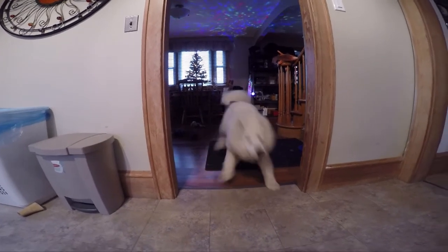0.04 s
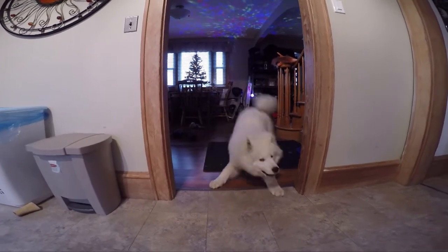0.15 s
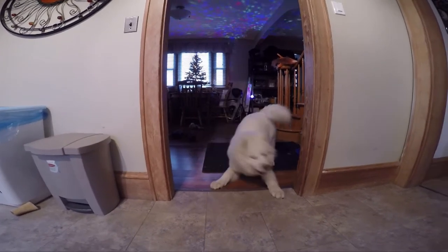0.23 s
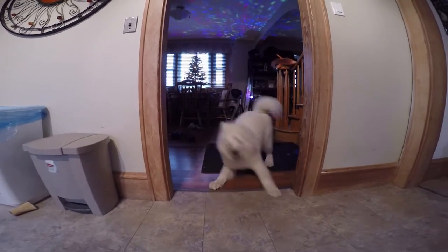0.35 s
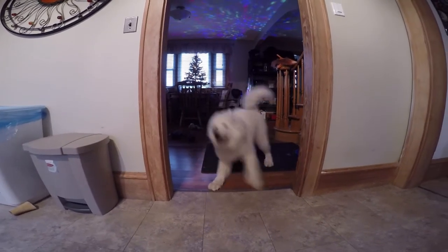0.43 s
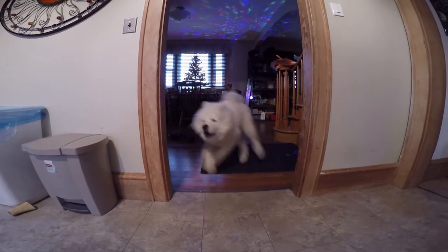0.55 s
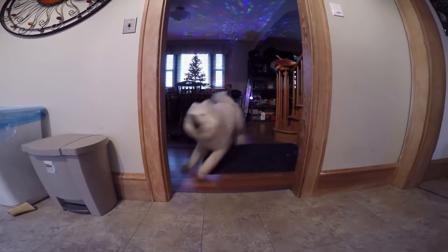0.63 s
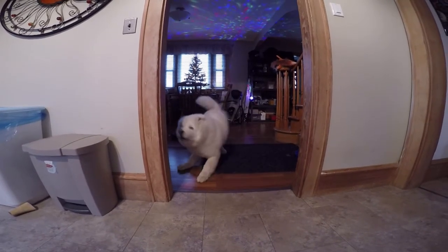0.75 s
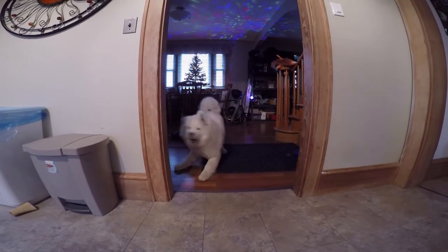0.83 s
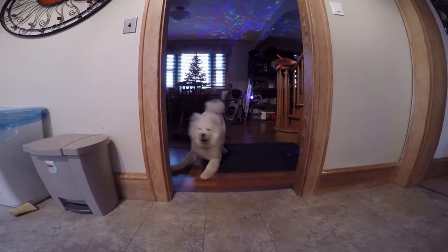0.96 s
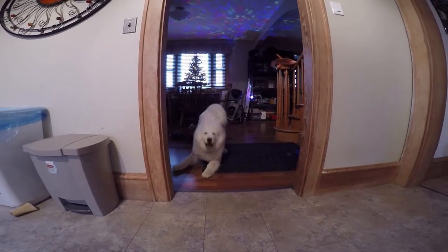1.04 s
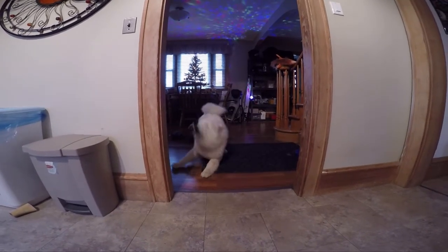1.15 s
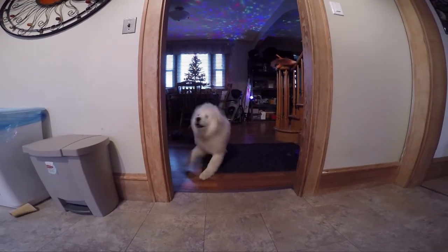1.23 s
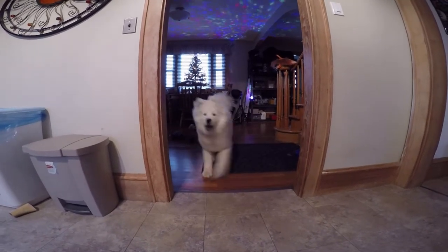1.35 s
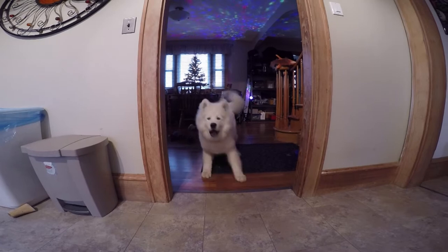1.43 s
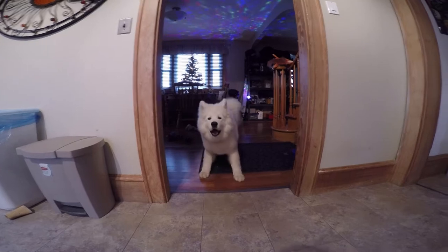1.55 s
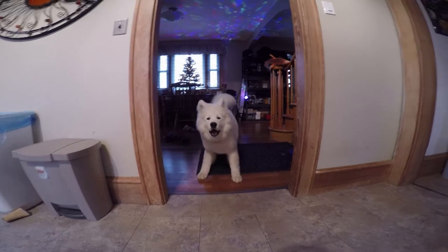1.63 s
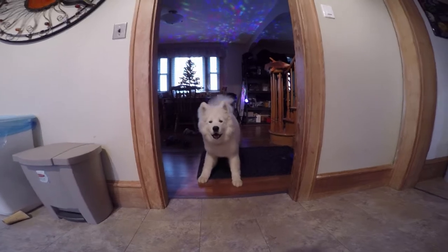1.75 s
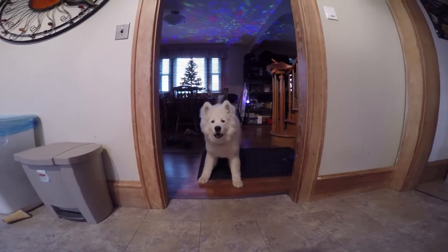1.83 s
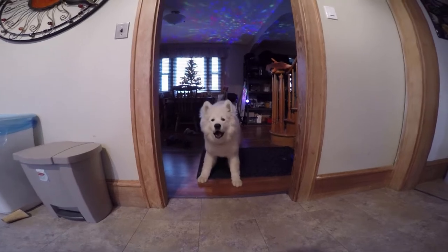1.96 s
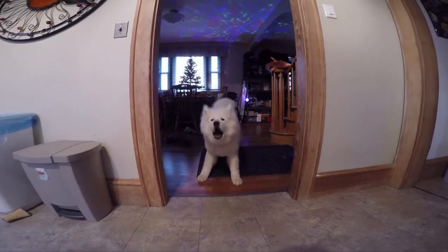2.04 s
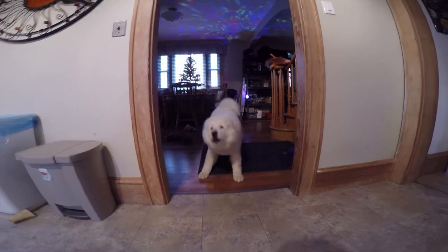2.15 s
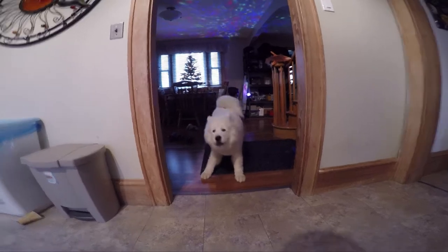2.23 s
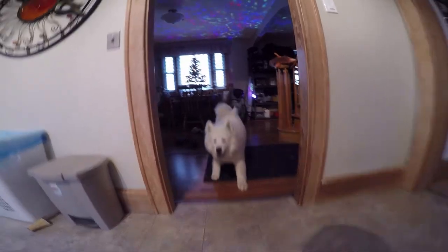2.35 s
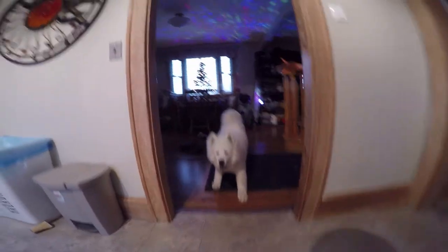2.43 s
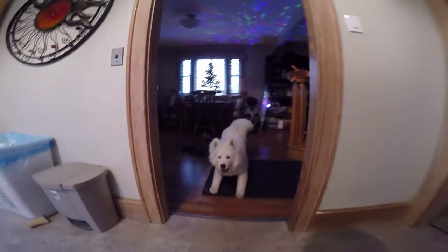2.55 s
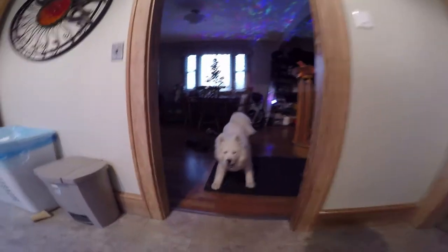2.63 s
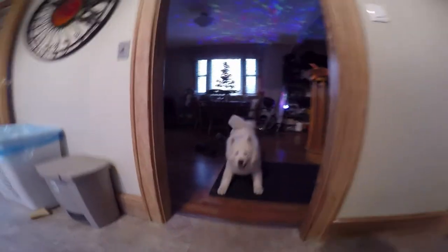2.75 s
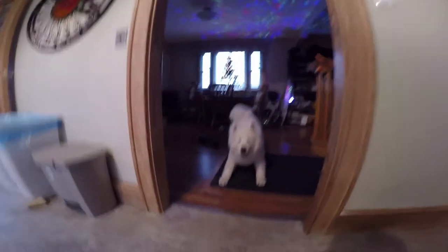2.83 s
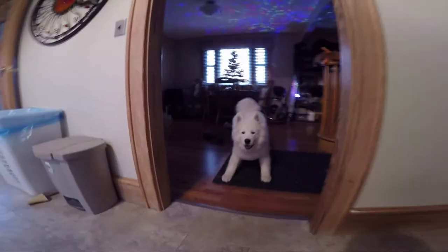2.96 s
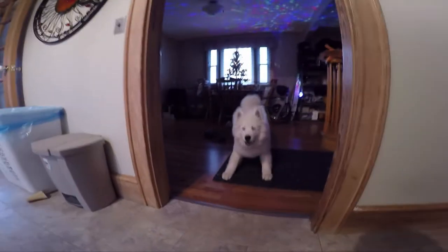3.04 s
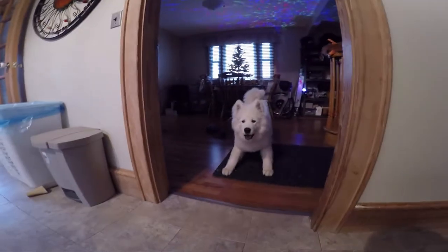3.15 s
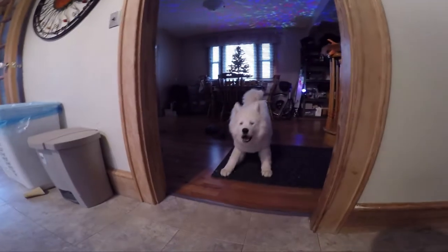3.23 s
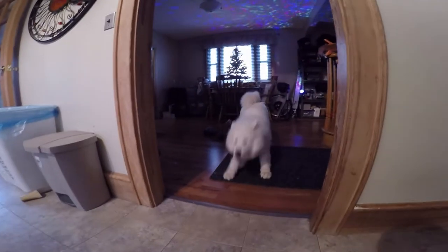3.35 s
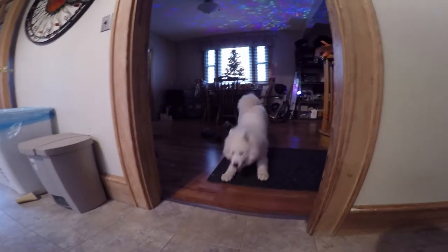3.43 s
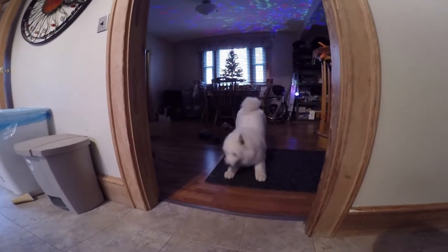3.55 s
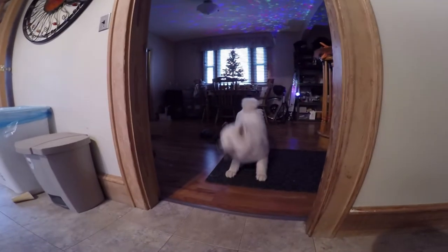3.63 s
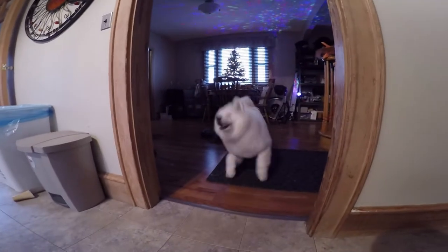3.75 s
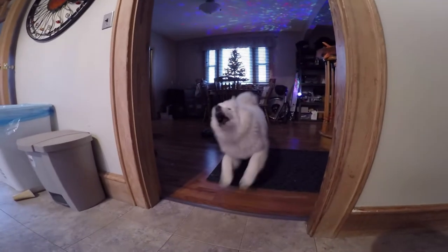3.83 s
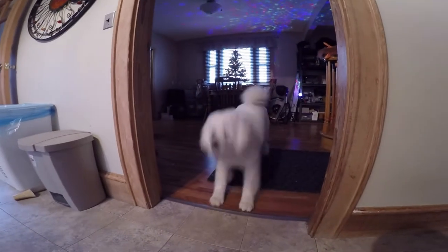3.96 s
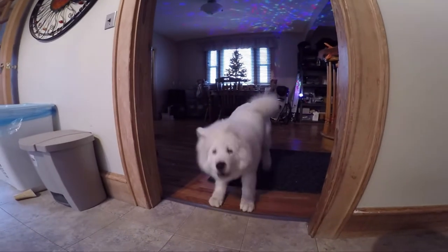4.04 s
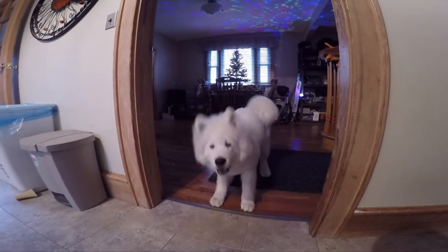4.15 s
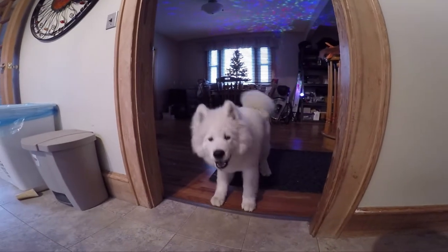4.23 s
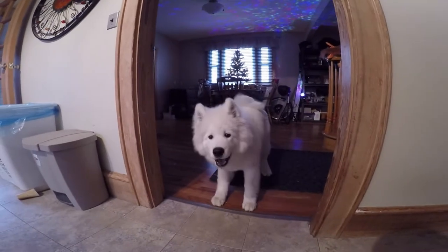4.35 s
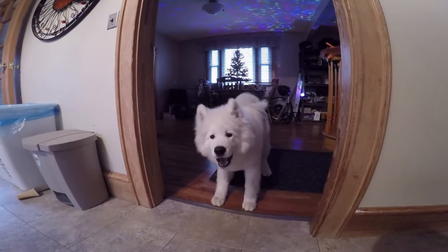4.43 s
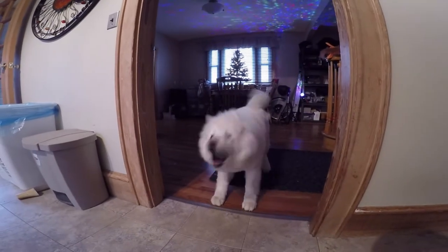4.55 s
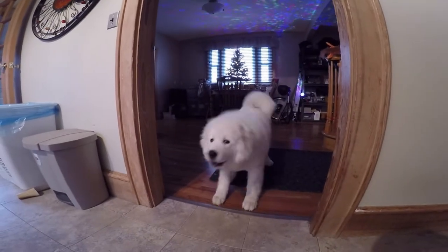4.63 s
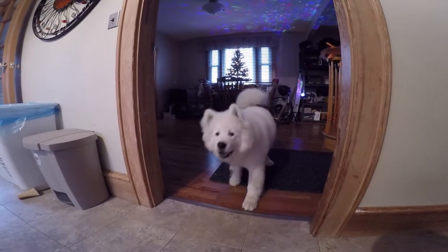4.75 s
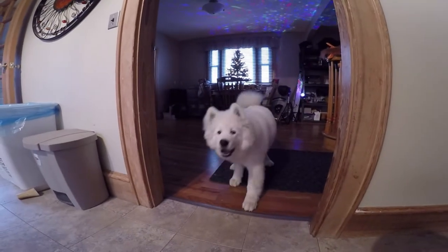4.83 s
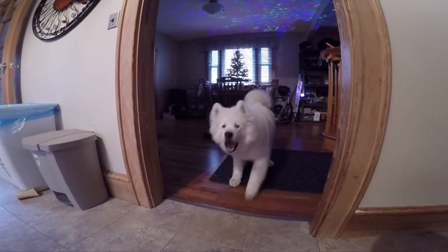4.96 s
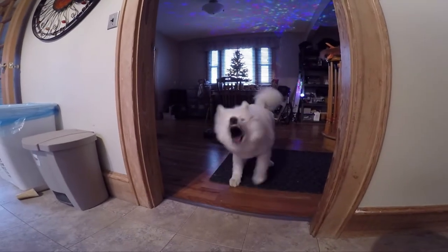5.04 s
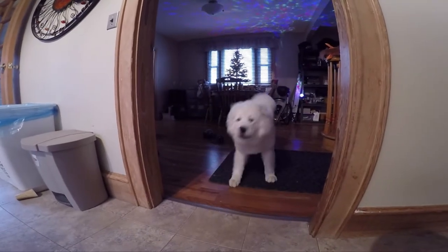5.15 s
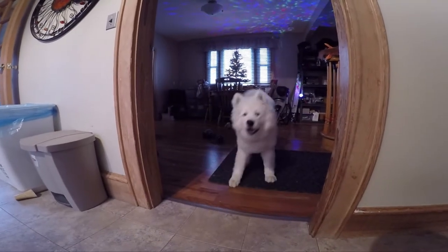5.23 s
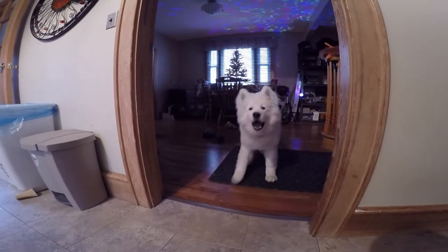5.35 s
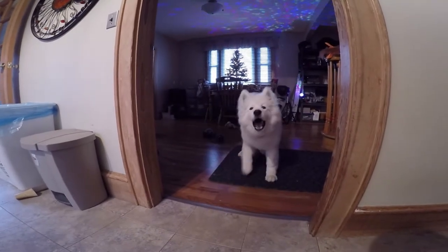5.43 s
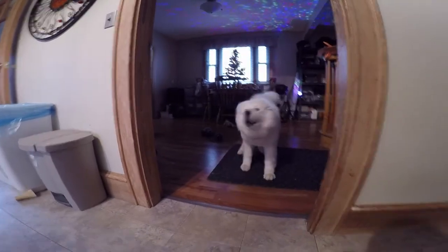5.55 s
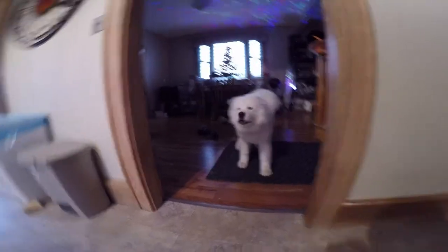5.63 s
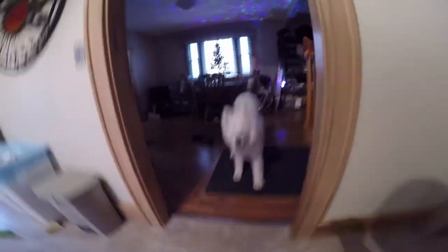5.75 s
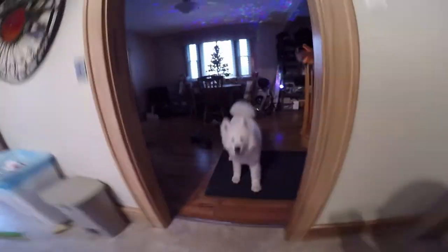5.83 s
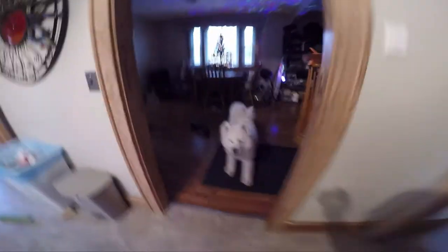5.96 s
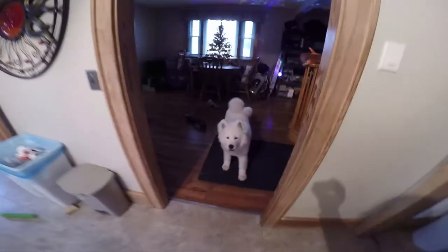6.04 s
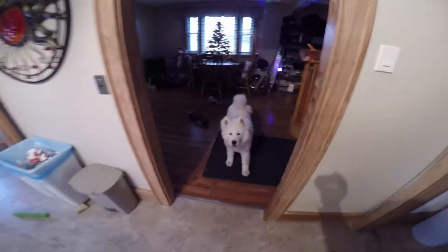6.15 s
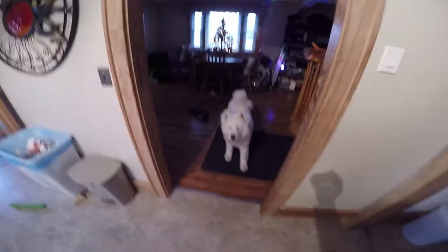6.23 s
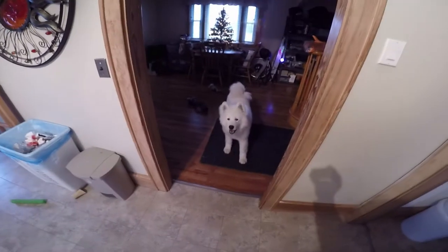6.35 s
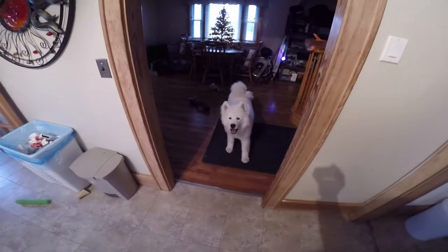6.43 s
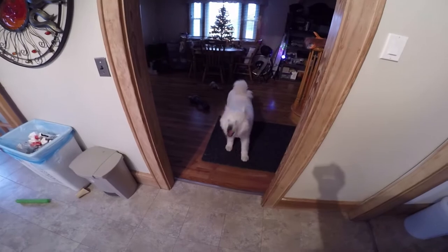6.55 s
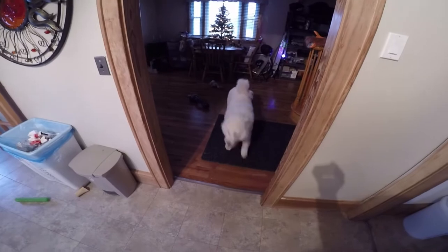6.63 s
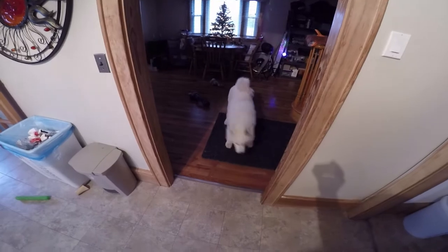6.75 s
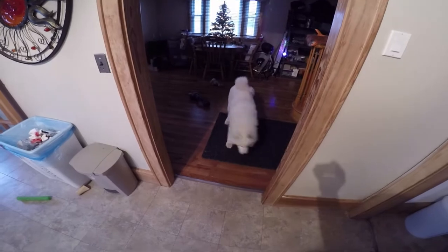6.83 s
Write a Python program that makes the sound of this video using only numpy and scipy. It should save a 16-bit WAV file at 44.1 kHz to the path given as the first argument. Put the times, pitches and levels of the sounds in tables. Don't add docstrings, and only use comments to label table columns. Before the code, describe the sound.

Indoors, a puppy's claws scrabble and its paws thud on a floor, then it barks sharply, nine single yaps spaced over about six seconds, with a faint whimper midway. Light claw taps, soft steps and skids fall between. The rooms ring briefly after each bark. A handheld microphone a few metres away picks up low rumble and an appliance hum that dips at barks and swells back.

```python
import sys
import numpy as np
from scipy import signal
from scipy.fft import rfft, irfft
from scipy.io import wavfile
from scipy.ndimage import uniform_filter1d, minimum_filter1d

SR = 44100
rng = np.random.default_rng(int(sys.argv[2]) if len(sys.argv) > 2 else 0)


def master(y):
    cut = np.clip(np.atleast_2d(y).T, -1, 1)
    pcm = np.round(cut * 32767)
    wavfile.write(sys.argv[1], SR, pcm.astype(np.int16))


def convert_level_to_amplitude(level_db):
    exponent = np.asarray(level_db, float) / 20
    return 10 ** exponent


N = 303849

# (start [s], climb [s], high note [s], low note [s], fade [s])
BARK_TIMES = [
    (.603, .026, .055, .028, .06),
    (1.088, .062, .022, .04, .035),
    (2.024, .026, .028, .042, .03),
    (3.224, .062, .014, .055, .04),
    (3.828, .034, .018, .044, .03),
    (3.978, .015, .02, .03, .02),
    (4.525, .027, .021, .044, .02),
    (5.008, .022, .021, .042, .016),
    (5.475, .036, .023, .032, .03),
    (6.547, .037, .023, .026, .055),
]


def puppy():
    # (climb from [Hz], climb to [Hz], high note [Hz], low note [Hz])
    notes_hz = [(514, 560, 575, 515), (396.4, 450, 610, 625), (507.2, 566, 625, 579), (689, 600, 570, 527),
                (653, 600, 580, 545), (541, 545, 550, 545), (372.3, 490, 658, 564), (369, 480, 660, 550),
                (380.5, 500, 652, 570), (371.5, 419, 636, 570)]
    # (first breath [dB], top of climb [dB], high note [dB], low note [dB], start of fade [dB])
    efforts = [(-15, -22, -6.5, -7, -18), (-24.5, -13, -10.5, -15.5, -23.5), (-22, -14, -7, -8, -16),
               (-39, -16, -8.5, -7, -16), (-23.5, -14, -6, -8, -17), (-30, -27.5, -28.5, -26, -27.5),
               (-16.5, -16.5, -5, -7.5, -19), (-27.5, -23, -9.5, -12, -22.5), (-24.5, -22, -9, -12.5, -19),
               (-19, -13, -7.5, -8.5, -15)]
    voices = [(.6, .62, .33, 1, .6), (.6, .45, .55, .4, .3), (.5, .48, .42, .5, .4), (.8, .6, .4, .75, .1),
              (.7, .65, .5, .8, .35), (.3, .2, .2, 0, .1), (.7, .15, .42, .15, .15), (.45, 0, .38, .1, .2),
              (.3, .03, .35, .1, .1), (.25, .2, .33, .1, .3)]
    # (climb [dB], high note [dB], low note [dB])
    jaws = [(-28, -13, -4.5), (14, 24, 21), (-6, -2.5, -1.5), (-24, -7, 4), (-1.5, 2, -3), (-13, -17, -24),
            (-3.5, -10, 8.5), (7.5, -2.5, 14), (-2, -21, 16), (-9, 3.5, 13.5)]
    # (mouth resonance [Hz], mouth width [Hz], facing [dB])
    poses = [(1270, 520, -14.5), (1143, 690, 2), (1100, 810, -7), (1125, 72, -6), (1253, 430, -11.5),
             (1150, 340, -19), (1090, 550, 0.5), (1090, 570, 4.5), (1145, 740, 1.5), (1073, 630, 3)]
    # (breath [dB], chest [dB], echo [dB])
    bodies = [(-4.5, -19.5, -4.5), (13, -26.5, 1.5), (-0.5, -25.5, -2), (-7, -13.5, -1.5), (-1.5, -13, -5),
              (-3.5, -30, 0), (-1, -31.5, -5), (3, -41.5, 2), (-1.5, -43, 3), (2.5, -36, 1)]
    direct, scattered = np.zeros(N), np.zeros(N)
    for *plan, pose, body in zip(BARK_TIMES, notes_hz, efforts, voices, jaws, poses, bodies):
        breath_db, chest_db, echo_db = body
        start, sound = bark(phrase(*plan), *pose, breath_db, chest_db)
        span = slice(start, start + len(sound))
        direct[span] += sound
        scattered[span] += convert_level_to_amplitude(echo_db) * sound
    return direct, scattered


def phrase(timing, notes, effort, voice, jaw):
    leap_s, drop_s, catch_s, stop_s = 0.01106, .005, 0.0075, .006
    high_rise, low_sag, fade_sag = .02, 0.98, 0.95
    swell_db, catch_db, low_sag_db, fade_fall_db = 3, -7.5, -4, -10.5
    fade_rough, low_growl = .15, .6
    start, climb, high, low, fade = timing
    from_hz, to_hz, high_hz, low_hz = notes
    first_db, climb_db, high_db, low_db, fade_db = effort
    rough_in, rough_high, rough_low, growl_in, growl = voice
    climb_open_db, shut_db, wide_db = jaw
    steps = [0, climb - leap_s, leap_s, high, drop_s, catch_s, catch_s, low - 2 * catch_s, stop_s, fade]
    times = start + np.cumsum(steps)
    pitch = [from_hz, to_hz, high_hz * (1 - high_rise), high_hz * (1 + high_rise)]
    pitch += [low_hz] * 3 + [low_sag * low_hz] * 2 + [fade_sag * low_hz]
    level = [first_db, climb_db, high_db - swell_db, high_db]
    level += [low_db, low_db + catch_db, low_db, low_db + low_sag_db, fade_db, fade_db + fade_fall_db]
    rough = [rough_in] * 2 + [rough_high] * 2 + [rough_low] * 4 + [rough_low + fade_rough] * 2
    growls = [growl_in] * 2 + [growl] * 2 + [low_growl * growl] * 6
    opening = [climb_open_db] * 2 + [shut_db] * 2 + [wide_db] * 6
    return list(zip(times, pitch, level, rough, growls, opening))


def bark(rows, mouth_hz, width_hz, facing_db, breath_db, chest_db):
    # (centre [Hz], width [Hz])
    throat = (630, 283)
    # (centre [Hz], width [Hz], level [dB])
    head = [(1792, 250, -12), (2440, 200, -25.5), (2829, 380, -17.5), (3274, 256, -22), (4600, 310, -55),
            (6500, 990, -38.5)]
    # (centre [Hz], width [Hz], level [dB])
    air = [(4700, 220, -54), (6760, 1200, -42), (8670, 2200, -42.5), (11300, 12000, -65)]
    start = round(rows[0][0] * SR)
    t = np.arange(start, round(rows[-1][0] * SR)) / SR
    size = len(t)
    pitch_hz, level_db, rough, growl, open_db = curve(rows, t)
    hoarse = 1.6 * np.clip(rough, 0, 1) ** 2
    growl = np.clip(growl, 0, 1)
    pitch_hz = pitch_hz * (1 + (.0025 + .06 * hoarse) * wander(size, 90))
    phase = 2 * np.pi * np.cumsum(pitch_hz) / SR
    below_peak_db = level_db - level_db.max()
    facing_db = facing_db + 0.44 * below_peak_db
    tract = [(1, [(*throat, 0)]),
             (convert_level_to_amplitude(open_db - 3.5), [(mouth_hz, width_hz, 0)]),
             (convert_level_to_amplitude(facing_db), head)]

    tone = np.zeros(size)
    for third in range(2, 36):
        share = 1 if third % 3 == 0 else 0.69 * growl
        gain = sum(g * resonances(pitch_hz * third / 3, modes) for g, modes in tract)
        flutter = convert_level_to_amplitude((1.5 + 5 * hoarse) * min(third / 9, 1.3) * wander(size, 60))
        tone += share * gain * flutter * np.sin(phase * third / 3 - .12 * third ** 2)

    puffs = rng.standard_normal(size) * (1 + 0.3 * np.cos(phase))
    puffs = puffs / np.std(through(puffs, tract[0][1]))
    breath = sum(g * through(puffs, modes) for g, modes in tract)
    breath = breath + convert_level_to_amplitude(facing_db + 5.5) * through(puffs, head)
    voice = tone + (.05 + .7 * hoarse) * breath
    gusts_db = .5 * below_peak_db + 3 * wander(size, 50)
    voice = voice + convert_level_to_amplitude(breath_db - 7.5 + gusts_db) * through(puffs, air)

    evened = voice / np.sqrt(uniform_filter1d(voice ** 2, size=500) + 1e-6)
    high_pass = signal.butter(6, 375, "high", fs=SR, output="sos")
    clear = signal.sosfilt(high_pass, evened * convert_level_to_amplitude(level_db))
    chest = convert_level_to_amplitude(level_db + chest_db + 8) * growl * np.sin(phase / 3)
    fade_in = np.clip((t - t[0]) / 0.008, 0, 1)
    fade_out = np.clip((t[-1] - t) / 0.0027, 0, 1)
    return start, (clear + chest) * fade_in * fade_out


def paws():
    grains = (rng.random(N) < 6000 / SR) * convert_level_to_amplitude(2.6 * np.minimum(rng.exponential(1, N), 3))
    grains = grains * rng.choice([-1, 1], N)
    drum = floorboards(grains)
    return skids(grains, drum) + thuds(drum) + claw_taps() + collar_tag()


def floorboards(grains):
    # (centre [Hz], width [Hz], level [dB])
    boards = [(104, 90, 11.5), (166, 300, 4), (315, 32, -16), (600, 370, 5), (912, 500, -14.5),
              (1255, 310, -0.5), (1840, 110, -6.5)]
    return unit(through(grains, boards)) * convert_level_to_amplitude(1.8 * wander(N, 25))


def skids(grains, drum):
    # (centre [Hz], width [Hz], level [dB])
    claw_modes = [(1280, 560, -1.5), (2000, 510, -4.5), (3020, 2700, 3.5), (3900, 610, -6), (5210, 950, -5),
                  (6660, 850, -11.5), (8600, 5000, -17)]
    # (time [s], slide [s], claw scrape [dB], floorboard [dB])
    slides = [(.016, 0.039, -39.5, -48), (0.093, 0.024, -31, -21.5), (0.149, 0.037, -35.5, -24.5),
              (0.239, 0.014, -49.5, -39), (0.418, 0.019, -42.5, -45.5), (0.521, .02, -58, -52),
              (1.23, 0.054, -45.5, -44.5), (1.35, 0.042, -53.5, -47.5), (1.46, .005, -40.5, -47),
              (2.55, 0.074, -68, -47.5), (2.646, 0.033, -59.5, -45.5), (2.85, 0.011, -68.5, -41.5),
              (2.98, 0.33, -61, -67), (3.4, .03, -57, -33.5), (3.5, 0.54, -59.5, -43),
              (3.96, 0.026, -50, -27.5), (4.03, 0.017, -50.5, -45), (6.42, 0.076, -64, -74),
              (6.8, 0.096, -87, -37)]
    t = np.arange(N)[::32] / SR
    scrape = unit(sum(through(grains, [mode]) * convert_level_to_amplitude(4 * wander(N, 14)) for mode in claw_modes))
    strokes = convert_level_to_amplitude([swells(t, s, slide, 1999, 150) for s, slide, *_ in slides])
    scrape_db, board_db = np.transpose(slides)[2:]
    return fine(convert_level_to_amplitude(scrape_db) @ strokes) * scrape + fine(convert_level_to_amplitude(board_db - 6.0) @ strokes) * drum


def thuds(drum):
    # (time [s], peak level [dB])
    landings = [
        (0.071, -9),
        (0.128, -22),
        (0.199, -20),
        (1.552, -26.5),
        (2.848, -44),
        (2.874, -20.5),
        (3.98, -17.5),
        (4.046, -27.5),
    ]
    t = np.arange(N) / SR
    blows = np.zeros(N)
    for s, db in landings:
        after = np.clip(t - s, 0, 1)
        blows += convert_level_to_amplitude(db - 11 - 60 * after / 0.043) * (after > 0)
    return blows * signal.sosfilt(signal.butter(2, 2500, fs=SR, output="sos"), drum)


def claw_taps():
    # (time [s], peak level [dB], ring [Hz])
    taps = [
        (0.0195, -14, 3630),
        (0.0956, -11, 4950),
        (0.417, -38, 3560),
        (1.041, -35, 3640),
        (1.081, -27.5, 3220),
        (1.234, -26.5, 3600),
        (1.3478, -42, 3900),
        (1.4586, -21.5, 4260),
        (3.2241, -38.5, 4250),
        (3.245, -35, 3130),
    ]
    band = signal.butter(2, [2800, 8500], "band", fs=SR, output="sos")
    crack = signal.sosfilt(band, rng.standard_normal(N))
    out = np.zeros(N)
    for s, db, hz in taps:
        out += ring(s, db - 4, hz, 0.011)
        out += np.abs(ring(s, db - 3, 250, 0.014)) * crack
    return out


def collar_tag():
    # (time [s], peak level [dB], ring [Hz], t60 [s])
    tinkles = [
        (.523, -39.5, 5720, 0.04),
        (1.36, -46, 5500, 0.025),
        (3.37, -44, 5600, 0.054),
    ]
    return sum(ring(*hit) for hit in tinkles)


def room(x):
    # (band centre [Hz], t60 [s])
    decay = [(200, 0.33), (500, 0.5), (1200, 0.61), (2400, 0.73), (4000, 0.47), (8000, 0.58), (14000, 0.82)]
    tail_db, near_db, near_t60_s = -13.5, -11, 0.14
    t = np.arange(SR) / SR
    echoes = rng.standard_normal(SR) * (rng.random(SR) < .01 + t / .1) * (t > .003)
    spectrum = rfft(echoes)
    log_hz = np.log(np.fft.rfftfreq(SR, 1 / SR) + 1)
    centres = np.log(np.array(decay)[:, 0])
    tail = np.zeros(SR)
    for (_, t60), peak in zip(decay, np.eye(len(decay))):
        band = irfft(spectrum * np.interp(log_hz, centres, peak), SR)
        tail += band * convert_level_to_amplitude(-60 * t / t60) * (t > .003)
    near = echoes * convert_level_to_amplitude(-60 * t / near_t60_s)
    response = convert_level_to_amplitude(tail_db) * unit(tail) + convert_level_to_amplitude(near_db) * unit(near)
    return signal.fftconvolve(x, response / np.sqrt(SR))[:N]


def background():
    # (time [s], hum [dB], hiss [dB])
    place = [(0.0, -47.5, -47), (.6, -49.5, -45.5), (1.3, -50.5, -48.5), (2.0, -49, -46.5), (2.7, -54, -51),
             (3.2, -47.5, -48.5), (3.8, -39.5, -41), (4.5, -49.5, -45.5), (5.2, -58.5, -57.5),
             (5.7, -54.5, -49), (6.1, -65.5, -54), (6.55, -62.5, -53), (6.89, -54, -45)]
    t = np.arange(N) / SR
    gain_db = fine(gain_control_db(t[::32]))
    hum_db, hiss_db = curve(place, t) + gain_db
    return convert_level_to_amplitude(hum_db) * mains_hum(t) + convert_level_to_amplitude(hiss_db) * air_hiss() + hand_rumble(t, gain_db)


def gain_control_db(t):
    duck_db, duck_s, recover_db_per_s = -11.5, 0.26, 16
    gains = []
    for start, *_ in BARK_TIMES:
        after = t - start
        duck = duck_db * np.clip(after / duck_s, 0, 1)
        recovery = recover_db_per_s * np.maximum(after - duck_s, 0)
        gains.append(np.minimum(duck + recovery, 0))
    return np.min(gains, axis=0)


def mains_hum(t):
    # (line [Hz], level [dB])
    lines = [(60, -18), (120, 12.5), (215, -21), (240, -17), (297, -8)]
    return sum(convert_level_to_amplitude(db - 0.5 + 1.2 * wander(N, 17)) * np.sin(2 * np.pi * hz * t) for hz, db in lines)


def air_hiss():
    # (frequency [Hz], density [dB per Hz])
    spectrum = [(76, -41.5), (130, -19.5), (294, -3.5), (388, -20), (428, -7.5), (718, -16.5), (777, -8.5),
                (929, -14), (6260, -30), (15000, -54)]
    return coloured(rng.standard_normal(N), spectrum) * convert_level_to_amplitude(0.36 * wander(N, 3.1))


def hand_rumble(t, gain_db):
    # (time [s], hold [s], level [dB])
    shakes = [(.04, 0.026, -32.5), (0.147, 0.025, -25.5), (0.437, .01, -46), (0.603, .04, -38),
              (0.73, 0.072, -37), (1.07, 0.012, -41.5), (1.22, .02, -59), (1.4, .04, -48),
              (1.493, 0.035, -42), (2.098, 0.017, -34.5), (2.436, 0.03, -52), (2.702, 0.054, -35.5),
              (2.865, .12, -34.5), (3.116, .02, -41.5), (3.24, 0.075, -33), (3.425, .04, -45),
              (3.58, 0.054, -43.5), (3.85, .07, -39.5), (4.001, 0.018, -29), (4.07, .1, -41),
              (4.58, 0.045, -38.5), (4.857, 0.015, -55), (5.064, .02, -48), (5.55, .03, -51.5),
              (5.82, .01, -57), (6.592, 0.12, -47)]
    grip_db = -53
    thumps = [db + swells(t[::32], s, hold, 299.5, 162.5) for s, hold, db in shakes]
    level_db = np.maximum(grip_db + gain_db, fine(np.max(thumps, axis=0)))
    spectrum = [(12, -24), (25, -2.0), (55, -1.0), (90, -7.0), (200, -20), (600, -57)]   # (Hz, dB)
    return convert_level_to_amplitude(level_db) * coloured(rng.standard_normal(N), spectrum)


def unit(x):
    return x / np.sqrt(np.mean(x ** 2) + 1e-20)


def curve(rows, t):
    s, *columns = np.transpose(rows)
    return [np.interp(t, s, c) for c in columns]


def coloured(x, points):
    hz = np.maximum(np.fft.rfftfreq(len(x), 1 / SR), 1)
    point_hz, point_db = np.transpose(points)
    gain = convert_level_to_amplitude(np.interp(np.log(hz), np.log(point_hz), point_db))
    return unit(irfft(rfft(x) * gain, len(x)))


def wander(size, rate_hz):
    r = np.exp(-2 * np.pi * rate_hz / SR)
    noise = rng.standard_normal(size + 4000)
    return unit(signal.lfilter([1], [1, -2 * r, r * r], noise)[4000:])


def resonances(hz, modes):
    return sum(convert_level_to_amplitude(db) / (1 + ((hz - centre) / (width / 2)) ** 2) for centre, width, db in modes)


def through(x, modes):
    return irfft(rfft(x) * resonances(np.fft.rfftfreq(len(x), 1 / SR), modes), len(x))


def ring(at, peak_db, hz, t60):
    out, start = np.zeros(N), int(at * SR)
    t = np.arange(min(N - start, SR // 4)) / SR
    out[start:start + len(t)] = convert_level_to_amplitude(peak_db - 60 * t / t60) * np.sin(2 * np.pi * hz * t)
    return out


def swells(t, start, hold, rise_db_per_s, fall_db_per_s):
    rise = -rise_db_per_s * np.maximum(start - t, 0)
    return rise - fall_db_per_s * np.maximum(t - start - hold, 0)


def fine(coarse):
    return np.interp(np.arange(N) / 32, np.arange(len(coarse)), coarse)


def scene():
    direct, scattered = puppy()
    feet = paws()
    return (direct + feet + room(scattered + feet) + background())[None]


def band_limit(x):
    return signal.sosfilt(signal.butter(12, 15660, fs=SR, output="sos"), x)


def record(dry):
    headroom = minimum_filter1d(np.minimum(.92 / (np.abs(dry) + 1e-9), 1), size=401)
    held = dry * uniform_filter1d(headroom, size=201)
    low_pass = signal.cheby2(12, 60, 15950, fs=SR, output="sos")
    mix = signal.sosfilt(low_pass, held)
    return band_limit(mix)


dry = scene()
out = record(dry)
master(out)
```